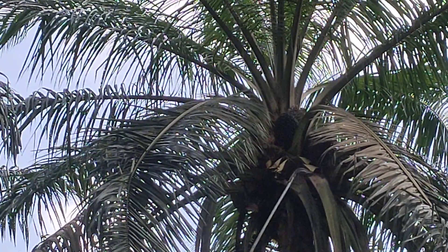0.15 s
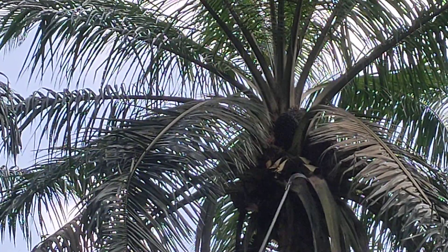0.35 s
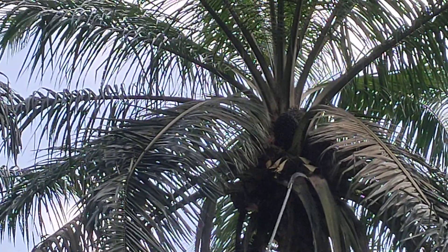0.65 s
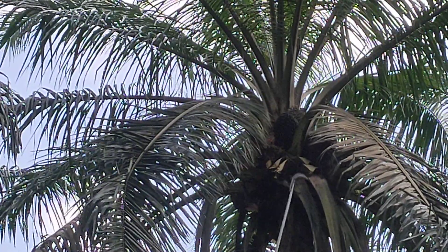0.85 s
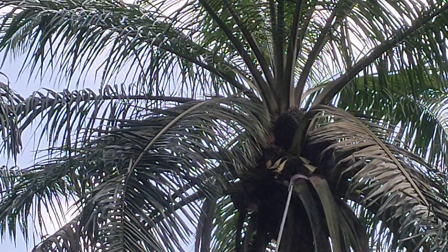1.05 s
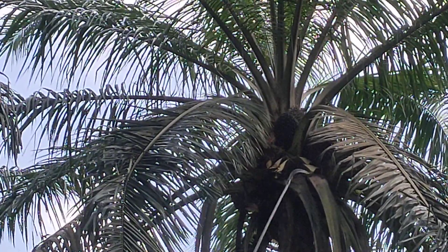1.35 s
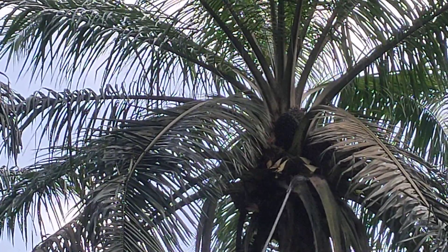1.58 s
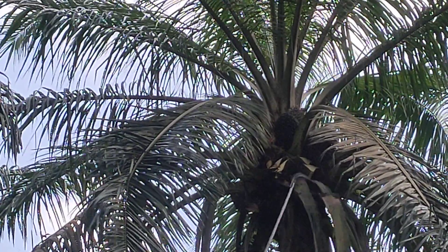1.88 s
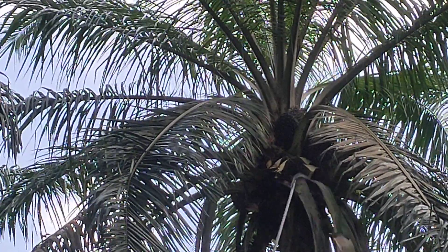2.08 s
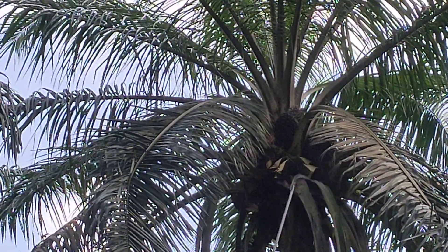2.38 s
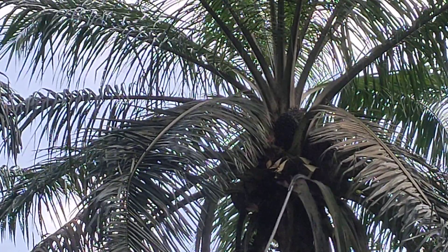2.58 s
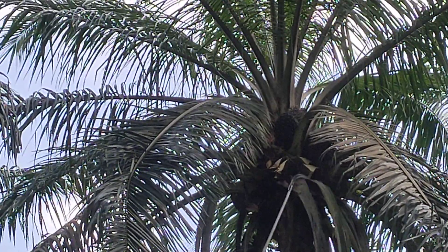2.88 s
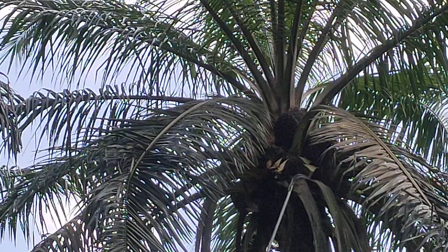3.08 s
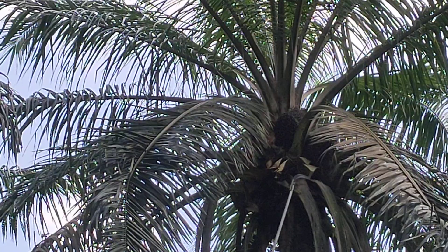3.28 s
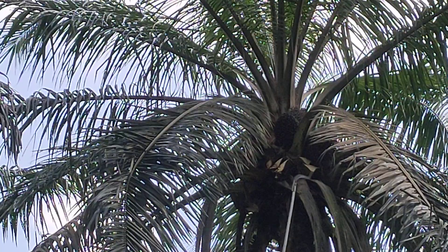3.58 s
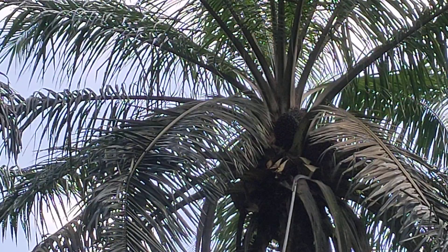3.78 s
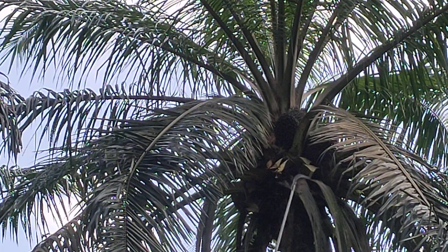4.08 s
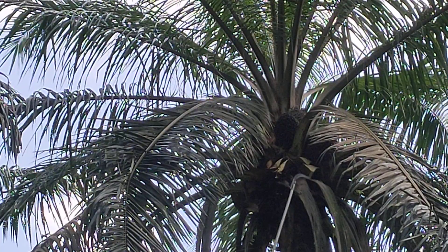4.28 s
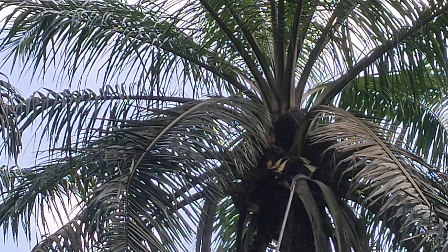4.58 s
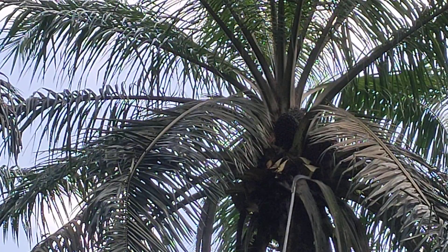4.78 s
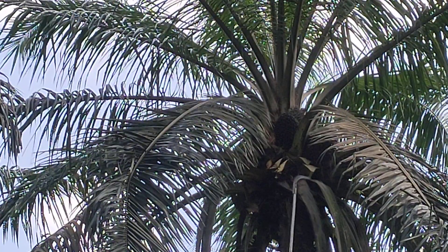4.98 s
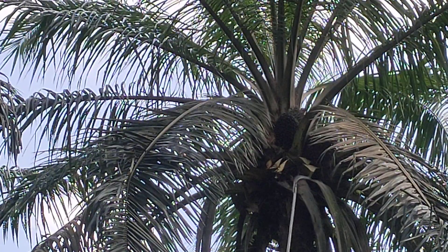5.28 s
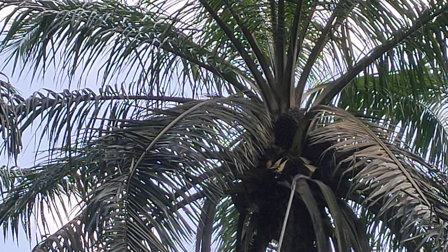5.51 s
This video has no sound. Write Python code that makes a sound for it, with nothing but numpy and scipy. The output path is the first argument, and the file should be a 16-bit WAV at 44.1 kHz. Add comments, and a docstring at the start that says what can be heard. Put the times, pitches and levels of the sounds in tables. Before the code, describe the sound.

A blade on a long metal pole tugs and scrapes at a palm frond, which cracks loose, rustles down and thuds to the ground.

```python
"""Insects, a far engine, a little wind and bird whistles; then a sickle on a long metal pole cuts an oil palm frond.
Each tug sends a falling chirp down the pole, by frequency-dependent delay, and filtered noise bursts crack the stalk.
The frond tears loose and rustles down through the crown as shaped clicks and noise, ever louder, then crashes;
damped stalk modes make the thud. Birds are gliding tones; insects, wind and engine are coloured noise."""
import sys
import numpy as np
from scipy import signal
from scipy.fft import rfft, irfft, next_fast_len
from scipy.io import wavfile
from scipy.ndimage import uniform_filter1d, map_coordinates

SR = 44100
rng = np.random.default_rng(int(sys.argv[2]) if len(sys.argv) > 2 else 0)


def output_pcm(signal):
    """Save a mono or channel-first signal as 16-bit PCM at the path in sys.argv[1].

    Samples are clipped to [-1, 1] before scaling.
    """
    pcm = np.clip(np.atleast_2d(signal).T, -1, 1) * 32767
    wavfile.write(sys.argv[1], SR, np.round(pcm).astype(np.int16))


N = 249165

# Spectrum of snapping fibres. Each row: frequency in Hz, relative density in dB per Hz.
FIBRE_SPECTRUM = [(600, -27), (1500, 0.5), (3000, -0.5), (5000, 0.5), (7000, 0.5), (9000, -6), (12000, -15),
                  (15500, -36)]
# The frond slides through the crown. Each row: time in seconds, friction in dB before each layer's gain.
SLIDE_FRICTION = [(1.72, -62.5), (1.788, -54.5), (2.048, -52.5), (2.514, -53), (2.794, -50.5), (2.95, -47),
                  (3.27, -58.5)]
TEAR_S, TEAR_RISE_S = 1.612, 0.004  # the stalk rips


def amp(db):
    """Decibels to gain."""
    return 10 ** (np.asarray(db) / 20)


def unit(x):
    """Scale to rms 1."""
    return x / np.sqrt(np.mean(x ** 2) + 1e-20)


def along(points, hz):
    """Interpolate (Hz, value) points on a log frequency axis."""
    f, v = np.transpose(points)
    return np.interp(np.log(hz + 1), np.log(f + 1), v)


def level(rows):
    """Gain per sample from (s, dB) rows, -120 dB outside them."""
    s, db = np.transpose(rows)
    return amp(np.interp(np.arange(N) / SR, s, db, left=-120, right=-120))


def wobble(rate_hz):
    """A smooth random curve, rate_hz knots a second."""
    knots = rng.standard_normal(int(N * rate_hz / SR) + 4)
    return map_coordinates(knots, [np.arange(N) * rate_hz / SR])


def swell(s, rise_s, hold_s, fade_db_per_s):
    """An envelope that rises exponentially towards 1 from time s and fades once hold_s has passed."""
    age = np.maximum(np.arange(N) / SR - s, 0)
    return (1 - np.exp(-age / rise_s)) * amp(-fade_db_per_s * np.maximum(age - hold_s, 0))


def filtered(x, response):
    """x times a complex response of frequency."""
    n = x.shape[-1]
    m = next_fast_len(n + SR // 10)
    return irfft(rfft(x, m) * response(np.fft.rfftfreq(m, 1 / SR)), m)[..., :n]


def band(x, centre_hz, octaves):
    """Favour the frequencies around a centre, at rms 1."""
    return unit(filtered(x, lambda hz: 1 / (1 + (np.log2((hz + 1) / centre_hz) / octaves) ** 2)))


def add(track, s, sound):
    """Mix a sound into a track at time s."""
    part = track[..., max(round(s * SR), 0):]
    part[..., :sound.shape[-1]] += sound[..., :part.shape[-1]]


def spread(pair, spectrum):
    """Colour two unrelated signals and blend them into left and right, rms 1."""
    # Each row: frequency in Hz, left-right likeness from 0 to 1.
    likeness = [(50, 0.8), (300, 0.95), (1000, 0.42), (2000, 0.29), (4000, 0.16), (8000, 0.15),
                (13000, 0.12)]

    def response(hz):
        turn = np.arccos(np.clip(along(likeness, hz), -1, 1)) / 2
        return amp(along(spectrum, hz)) * [np.cos(turn), np.sin(turn)]

    mid, side = filtered(pair, response)
    return unit(np.array([mid + side, mid - side]))


def rush(spectrum):
    """Stereo noise of rms 1."""
    return spread(rng.standard_normal((2, N)), spectrum)


def crackle(rate_hz, scatter_db):
    """Two trains of tiny clicks that share their moments and uneven sizes, rms 1."""
    size = amp(scatter_db * np.clip(rng.standard_normal(N), -2, 2))
    hits = rng.random(N) < rate_hz / SR
    return unit(hits * size * rng.standard_normal((2, N)))


def patchy(pair, depth_db):
    """Each brushed leaflet has its own colour for a moment: noise varies the gain over time and pitch."""
    z = signal.stft(pair, nperseg=256)[2]
    field = uniform_filter1d(rng.standard_normal(z.shape[1:]), size=11, axis=0)
    field = uniform_filter1d(field, size=3, axis=1)
    return signal.istft(z * amp(depth_db * unit(field)), nperseg=256)[1][:, :N]


def grove(x):
    """Scattered echoes from trunks and crowns: a noise tail that decays at its own rate per frequency."""
    # Each row: frequency in Hz, t60 in seconds.
    decay = [(100, 0.48), (500, 0.91), (1500, 0.62), (5000, 0.92), (12000, 0.37)]
    hz, t, z = signal.stft(rng.standard_normal((2, SR)), SR, nperseg=256)
    tail = signal.istft(z * amp(-60 * t / along(decay, hz)[:, None]), SR, nperseg=256)[1]
    tail = tail * (1 - np.exp(-np.arange(tail.shape[1]) / SR / 0.0013))
    return signal.fftconvolve(np.atleast_2d(x), tail / np.linalg.norm(tail[0]), axes=1)[:, :N]


def ports(x):
    """Sound from the front left reaches the left port first; each port has its own colour."""
    # Each row: frequency in Hz, left-over-right balance in dB.
    balance = [(100, 1.5), (700, 2), (2400, 2), (3600, 3.5), (6200, 7.5), (7700, -0.5), (9500, -3),
               (14000, 0.5)]
    lag_s = 1.5 / SR

    def port(hz, side):
        return amp(side * along(balance, hz) / 2) * np.exp(1j * np.pi * side * hz * lag_s)

    return filtered(x, lambda hz: np.array([port(hz, side) for side in (1, -1)]))


def plantation(insect_db=-59.5, wind_db=3, engine_db=-8, engine_hz=200, throb_hz=13.0):
    """Insects, low wind with a few buffets mostly on the left port, and a far throbbing engine, all noise."""
    # Each row: time in seconds, level in dB of wind and engine before their gains.
    background = [(0, -55), (.45, -52), (.95, -59.5), (1.45, -61), (1.75, -56), (2.2, -57), (2.5, -54),
                  (3.0, -54.5), (4.65, -54), (5.3, -58.5), (5.65, -64.5)]
    # Wind on the microphone. Each row: time in seconds, half width in seconds, level in dB before port gains.
    buffet_rows = [(2.41, .05, -48), (4.135, .03, -41), (4.2, .03, -42), (4.27, .035, -37)]
    # Each row: frequency in Hz, relative density in dB per Hz.
    insect_spectrum = [(200, 13), (500, -3), (1000, -1), (2000, 0), (3400, 4), (4000, 2.5), (4750, 7.5),
                       (5600, -3), (6400, -2.5), (7200, 6), (8200, -4.5), (9500, -11.5), (12000, -16),
                       (15500, -26)]
    # Each row: frequency in Hz, relative density in dB per Hz.
    wind_spectrum = [(10, -1.5), (25, 3), (55, -3), (90, -6), (140, -16), (230, -20), (330, -20.5),
                     (500, -26.5), (1500, -44)]
    buffet_spectrum = [(15, 5.0), (40, 11), (90, -16), (300, -23.0), (1000, -72)]

    t, low = np.arange(N) / SR, level(background)
    insects = amp(insect_db + 2.26 * wobble(3.565)) * ports(rush(insect_spectrum))
    wind = amp(wind_db + 0.66 * wobble(11.0)) * low * rush(wind_spectrum) * amp([[1.5], [-1.5]])
    gusts = sum(amp(db) * np.exp(-((t - s) / width_s) ** 2) for s, width_s, db in buffet_rows)
    buffets = gusts * rush(buffet_spectrum) * amp([[3], [-13]])
    throb = 1 + .6 * np.sin(2 * np.pi * throb_hz * t + .5 * wobble(2))
    exhaust = [(engine_hz / 2, -25), (engine_hz * 0.78, -10), (engine_hz, 0),
               (engine_hz * 1.21, -8), (engine_hz * 2, -24), (2000, -80)]
    engine = amp(engine_db) * low * throb * rush(exhaust)
    return insects + wind + buffets + engine


def whistle(hz, gain, waver=0.0066, flutter_db=3.5):
    """A tone along a pitch and gain contour that flutters on its way through the leaves."""
    u = np.linspace(0, 1, len(hz))
    knots = rng.standard_normal((2, len(u) // 200 + 2))
    drift, flutter = [np.interp(u, np.linspace(0, 1, len(k)), k) for k in knots]
    phase = 2 * np.pi * np.cumsum(hz * (1 + waver * drift)) / SR
    return np.sqrt(2) * gain * amp(flutter_db * flutter) * np.sin(phase)


def birds(dry_db=-2, slur_echo_db=-3.0, other_echo_db=-8):
    """One bird repeats a falling slur; others add gliding notes of arched loudness from among the palms."""
    # Falling slurs. Each row: start in seconds, length in seconds, level in dB before the mix gains.
    slur_rows = [(0.124, 0.11, -48), (0.959, 0.12, -51.5), (1.715, .112, -46.5), (4.186, .12, -48),
                 (4.987, 0.091, -50.5)]
    # Other birds. Each row: start in seconds, length in seconds, start in Hz, end in Hz, level in dB before mix.
    note_rows = [(0, 0.12, 3340, 3050, -62.5), (0, 0.12, 5300, 5000, -61), (4.365, 0.052, 4980, 5170, -63),
                 (4.413, 0.46, 3425, 3320, -68), (4.574, 0.062, 1740, 2560, -66),
                 (4.618, 0.053, 2580, 2620, -65), (4.68, 0.14, 2170, 2030, -57.5),
                 (5.29, 0.12, 1515, 1620, -75), (5.393, 0.12, 1630, 2015, -64),
                 (5.519, 0.1, 1965, 2130, -59.5), (5.553, 0.057, 3700, 4900, -62),
                 (5.585, .065, 5200, 5350, -70)]
    top_hz, knee_hz, end_hz = 4700, 3564, 2250  # sinks slowly, then plunges
    knee_share, swell_db, fade_db = .67, 25, 10  # loudest at the knee

    slurs, others = np.zeros(N), np.zeros(N)
    for s, length_s, db in slur_rows:
        u = np.linspace(0, 1, round(length_s * SR))
        pitch_hz = np.interp(u, [0, knee_share, 1], [top_hz, knee_hz, end_hz])
        shape_db = np.interp(u, [0, knee_share, 1], [-swell_db, 0, -fade_db])
        add(slurs, s, whistle(pitch_hz, amp(db + shape_db)))
    for s, length_s, from_hz, to_hz, db in note_rows:
        u = np.linspace(0, 1, round(length_s * SR))
        arch = np.sqrt(np.abs(np.sin(np.pi * u)))
        add(others, s, whistle(from_hz + (to_hz - from_hz) * u, amp(db) * arch))
    direct = amp(dry_db) * (slurs + others) * amp([[1.5], [-1.5]])
    return direct + grove(amp(slur_echo_db) * slurs + amp(other_echo_db) * others)


def tear():
    """Envelope of the stalk ripping until the last fibres let go."""
    return swell(TEAR_S, TEAR_RISE_S, hold_s=.055, fade_db_per_s=150)


def fall(lead_s=0):
    """The frond drops free and rushes ever louder until the ground stops it, then fades."""
    drop_s, crash_s = 3.28, 3.578
    swell_db_per_s, fade_db_per_s = 66, 110
    t = np.arange(N) / SR
    late = t - (crash_s - lead_s)
    return (t > drop_s) / np.hypot(amp(-swell_db_per_s * late), amp(fade_db_per_s * late))


def leaflets(slide_db=4, tear_db=-43, crash_db=-33, clump_db=-0.17):
    """Dry leaflets flick in clumps, as clicks and noise, whenever the frond shakes, tears, slides or falls."""
    # Jolts that set the leaflets shaking. Each row: time in seconds, level in dB.
    shakes = [(-.05, -58.5), (.25, -57), (.37, -46.5), (.54, -55.5), (3.58, -45.5), (4.11, -52)]
    # Each row: frequency in Hz, relative density in dB per Hz.
    leaflet_spectrum = [(400, -16), (700, -17.5), (1000, -11), (2000, -9), (3200, -5), (5000, -5),
                        (7000, -4.5), (8500, -8.5), (10000, -15.5), (12000, -21), (15500, -30)]
    rise_s, hold_s, fade_db_per_s = 0.028, 0.028, 34

    clumps = amp(clump_db * wobble(130) + 0.66 * wobble(25.12))
    flicks = clumps * (crackle(5000, scatter_db=3) + rng.standard_normal((2, N)))
    moves = [amp(db) * swell(s, rise_s, hold_s, fade_db_per_s) for s, db in shakes]
    moves += [amp(tear_db) * tear(), amp(slide_db) * level(SLIDE_FRICTION), amp(crash_db) * fall()]
    return np.linalg.norm(moves, axis=0) * spread(patchy(flicks, depth_db=1.5), leaflet_spectrum)


def pole_modes(hz):
    """The pole's resonances as a complex response."""
    # Each row: frequency in Hz, width in Hz, gain in dB.
    resonances = [(744, 150, 6), (1021, 10, 3), (1150, 6.8, 3), (1291, 25, 4.5), (1410, 25, -24),
                  (1668, 26, 6), (1960, 33, -22), (2720, 130, 0)]
    return sum(amp(db) * 1j * hz * w / (c * c - hz * hz + 1j * hz * w) for c, w, db in resonances)


def scrape(catch_db=3, catch_rate_hz=70, low_hz=750, high_hz=1700):
    """The blade catches on fibre after fibre and keeps the pole buzzing: clicks through its resonances."""
    # Strokes along the stalk. Each row: start in seconds, length in seconds, level in dB.
    strokes = [(0.213, 0.16, -58.5), (0.365, 0.046, -54), (.5, 0.21, -59.5), (0.717, 0.17, -63.5),
               (1.426, 0.44, -62.5)]
    rise_s, fade_db_per_s = 0.012, 153

    def response(hz):
        return (0.97 + pole_modes(hz)) / (1 + (low_hz / (hz + 1)) ** 6) / (1 + (hz / high_hz) ** 4)

    catches = crackle(1500, scatter_db=0.0) * amp(catch_db * wobble(catch_rate_hz))
    buzz = filtered(catches[0], response)
    return unit(buzz) * sum(amp(db) * swell(s, rise_s, length_s, fade_db_per_s) for s, length_s, db in strokes)


def snaps(gain_db=-6.5, crack_t60_s=0.022, attack_s=0.0014, octaves=1.25):
    """Each snap of fibre or leaf rib is a sharp crack followed by splintering fibres, cut from noise."""
    # Each row: time in seconds, level in dB before gain_db, centre in Hz.
    snap_rows = [(0.2713, -31, 7000), (0.37, -32.5, 7040), (.406, -38, 6000), (1.618, -28.5, 7000),
                 (1.636, -26, 6000), (1.652, -40, 3500), (1.662, -38, 5500), (1.986, -31, 6000),
                 (2.394, -28, 5000), (2.521, -30, 4500), (2.6, -25.5, 3800), (2.628, -26.5, 3800),
                 (2.689, -24.5, 5000), (2.704, -25, 5500), (2.803, -27, 5500), (2.837, -31, 4500),
                 (2.899, -22.5, 4800), (2.918, -26, 3500), (2.93, -24, 4000), (3.084, -26.5, 3000),
                 (3.112, -25, 6020), (3.128, -25, 3000), (3.184, -29, 6100), (3.285, -25.5, 5000),
                 (4.97, -45, 4500), (5.158, -43, 5900)]
    out, t = np.zeros((2, N)), np.arange(SR // 10) / SR
    fibres = spread(patchy(rng.standard_normal((2, N)), depth_db=-0.5), FIBRE_SPECTRUM)
    splinters = .35 * amp(-60 * t / .06)
    shape = (amp(-60 * t / crack_t60_s) + splinters) * (1 - np.exp(-t / attack_s))
    for s, db, centre_hz in snap_rows:
        piece = fibres[:, round(s * SR):][:, :len(t)]
        add(out, s, amp(db + gain_db) * shape * band(piece, centre_hz, octaves))
    return out


def pole(travel_s=0.015, octaves=0.35, ring_db=6, gain_db=0, rattle_t60_s=0.062):
    """Bending waves run down the pole, high notes first, then rattle on in its resonances."""
    # Tugs and knocks. Each row: time in seconds, direct chirp's peak in dB, centre in Hz, rattle share.
    knock_rows = [(.273, -40.5, 1130, 0.53), (.368, -35, 1200, 0.54), (0.3968, -38, 1260, 0.39),
                  (0.4022, -38, 1200, 0.4), (0.512, -47.5, 1360, 1), (0.615, -49, 1070, .7),
                  (.68, -47, 980, 0.52), (.74, -49.5, 980, 0.67), (.813, -43, 1310, 0.54),
                  (0.896, -50, 940, 0.49), (1.412, -55, 1130, .5), (1.472, -50, 1130, .6),
                  (1.6166, -26, 1180, .2), (1.626, -27.5, 1280, 0.3), (1.637, -31, 1450, 0.78),
                  (1.648, -35, 1270, 0.34), (1.654, -33, 1150, 0.5), (1.772, -53.5, 865, .57),
                  (1.958, -50.5, 774, 0.97), (1.984, -43.5, 950, .8), (4.965, -51.5, 980, 0.6),
                  (5.085, -50, 1120, .5), (5.154, -43.5, 900, .28)]
    out, t = np.zeros(N), np.arange(SR // 4) / SR
    hz = np.fft.rfftfreq(len(t), 1 / SR) + 1
    lead_s = .03
    # delay falls with the root of frequency; a knock's time is the arrival of its 1.2 kHz part
    delay_s = travel_s * (np.sqrt(1000 / hz) - np.sqrt(1000 / 1200))
    modes = pole_modes(hz)
    for s, db, centre_hz, rattle in knock_rows:
        path = rng.uniform(.7, 1.15)  # scales the delay
        chirp = np.exp(-2j * np.pi * np.cumsum(lead_s + path * delay_s) * SR / len(t))
        colour = 1 / (1 + (np.log2(hz / centre_hz) / octaves) ** 2) ** 0.73
        colour = colour / (1 + (650 / hz) ** 7) / (1 + (hz / 3300) ** 8)
        joints = rng.standard_normal(len(t)) * amp(-60 * t / rattle_t60_s) * (1 - np.exp(-t / 0.0033))
        echoes = rfft(joints / np.linalg.norm(joints)) * (.7 + amp(ring_db) * modes)
        peak = np.abs(irfft(colour * chirp)).max()
        knock = irfft(colour * chirp * (1 + 0.14 * modes + rattle * echoes))
        add(out, s - lead_s, amp(db + gain_db) / peak * knock)
    return out


def thud(octaves=0.87, attack_s=0.0009, gain_db=0, soft_hz=900):
    """Soft, heavy contacts ring the damped modes of the stalk as it wrenches free, then meets the ground."""
    # Each row: time in seconds, peak in dB before the final low-pass, centre in Hz.
    blows = [(1.5892, -38, 347), (1.596, -43, 293), (3.513, -22, 260), (3.518, -21, 110), (3.521, -16, 696),
             (3.527, -33, 330), (3.5306, -13, 220)]
    # Each row: mode in Hz, level in dB relative to the others, t60 in seconds.
    stalk_modes = [(72, -1, 0.15), (146.4, -11, 0.25), (228, 8, 0.024), (295, -7.5, 0.052),
                   (389, -2, 0.069), (684, -1, 0.054)]
    out, t = np.zeros(N), np.arange(SR // 2) / SR
    for s, db, centre_hz in blows:
        ring = np.zeros(len(t))
        for hz, mode_db, t60_s in stalk_modes:
            nearness = 1 / (1 + (np.log2(hz / centre_hz) / octaves) ** 2)
            ring += amp(mode_db - 60 * t / t60_s) * nearness * np.sin(2 * np.pi * hz * t)
        ring = ring * (1 - np.exp(-(t / attack_s) ** 2))
        add(out, s, amp(db + gain_db) * ring / np.abs(ring).max())
    return filtered(out, lambda hz: 1 / (1 + (hz / soft_hz) ** 10))


def ribs(slide_db=-5, tear_db=-42, crash_db=-39):
    """The stiff ribs rub in rough bursts of clicks, with extra bursts where they catch."""
    # Ribs catch on other fronds. Each row: time in seconds, level in dB.
    catches = [(1.968, -45), (2.2, -53), (2.6, -48), (2.83, -51), (2.91, -43), (3.08, -49.5), (3.115, -50)]
    # Each row: frequency in Hz, relative density in dB per Hz.
    rib_spectrum = [(150, 0.5), (400, -0.5), (520, -9.5), (690, 1), (950, -13.5), (1400, -2.5), (2000, 1),
                    (3000, -1.5), (5000, -3), (9000, -34)]
    rise_s, hold_s, fade_db_per_s = 0.0071, 0.012, 164

    moves = [amp(db) * swell(s, rise_s, hold_s, fade_db_per_s) for s, db in catches]
    moves += [amp(tear_db) * tear(), amp(slide_db) * level(SLIDE_FRICTION), amp(crash_db) * fall()]
    rubbing = amp(4.1 * wobble(90)) * crackle(2500, scatter_db=2.5)
    return np.linalg.norm(moves, axis=0) * spread(rubbing, rib_spectrum)


def air(sag_db=-54, fall_db=-36):
    """The heavy stalk pushes air as it sags and again as it falls, a little ahead of its leaves."""
    # Each row: frequency in Hz, relative density in dB per Hz.
    air_spectrum = [(25, 1.5), (80, -2.5), (230, -1), (310, -6.5), (400, -2), (490, -12), (640, -8.5),
                    (900, -17), (2000, -33)]
    sag = amp(sag_db) * swell(TEAR_S, TEAR_RISE_S, hold_s=0.12, fade_db_per_s=85)
    return (sag + amp(fall_db) * fall(lead_s=0.0083)) * rush(air_spectrum)


def slaps(gain_db=1, centre_hz=4200, octaves=0.38, rise_s=0.0028, scatter_db=3, count=80):
    """Single leaflets of the sliding frond slap past their neighbours, each with its own pitch."""
    out, t = np.zeros((2, N)), np.arange(SR // 30) / SR
    shape = t / rise_s * np.exp(1 - t / rise_s)
    fibres = spread(rng.standard_normal((2, N)), FIBRE_SPECTRUM)
    times_s = rng.uniform(SLIDE_FRICTION[0][0], SLIDE_FRICTION[-1][0], count)
    for s, (size, pitch) in zip(times_s, rng.uniform(-0.98, 1, (count, 2))):
        piece = fibres[:, round(s * SR):][:, :len(t)]
        slap = shape * band(piece, centre_hz * 2 ** pitch, octaves)
        add(out, s, amp(gain_db + scatter_db * size) * slap)
    return out * level(SLIDE_FRICTION)


def frond():
    """Leaflets, ribs and moving air."""
    return leaflets() + slaps() + ribs() + air()


def scene():
    """The palm stands a little to the left; the grove echoes knocks, cracks and thuds."""
    knocks, cracks, stalk = pole(), snaps(), thud()
    echoes = grove(amp(-14) * knocks + amp(-2.5) * cracks)
    crown = knocks + scrape() + cracks + frond() + echoes
    thuds = stalk * amp([[1], [-1]]) + amp(-40) * grove(stalk)[0]
    return ports(crown) + thuds + birds() + plantation()


def record(dry):
    """Nothing passes above the band limit."""
    return filtered(dry, lambda hz: hz < 15730)


dry = scene()
out = record(dry)
output_pcm(out)
```